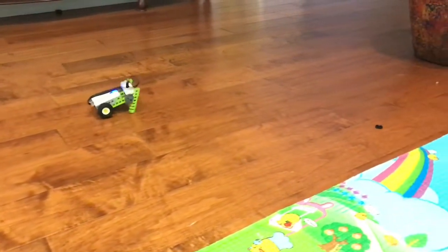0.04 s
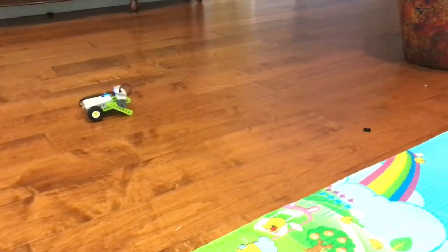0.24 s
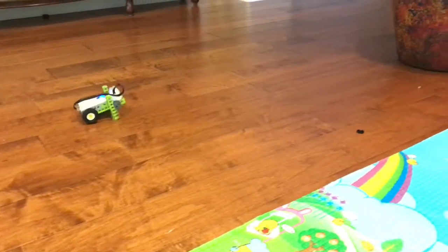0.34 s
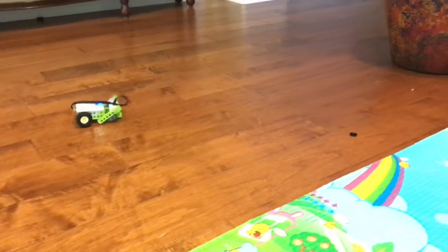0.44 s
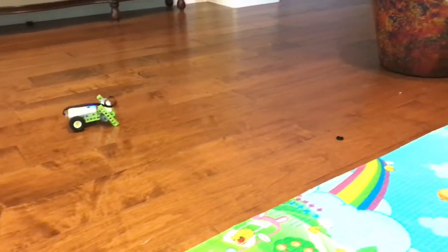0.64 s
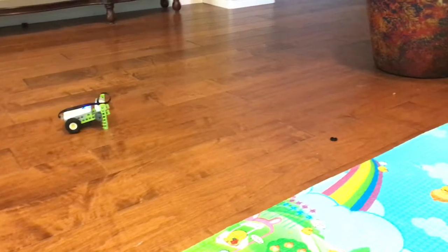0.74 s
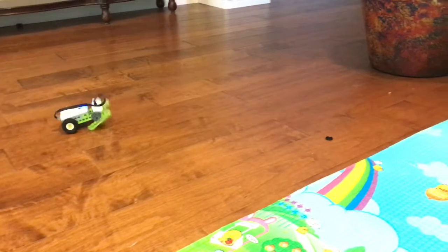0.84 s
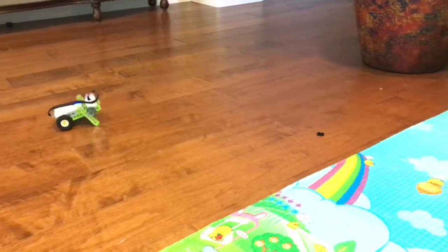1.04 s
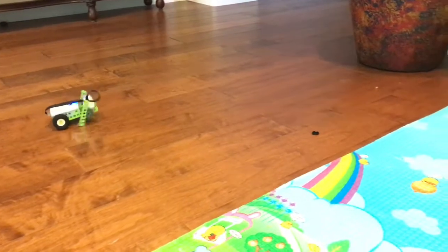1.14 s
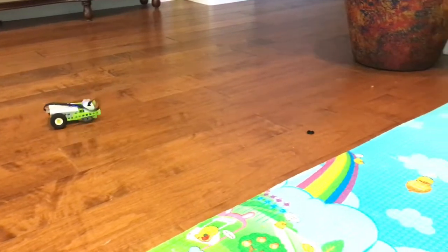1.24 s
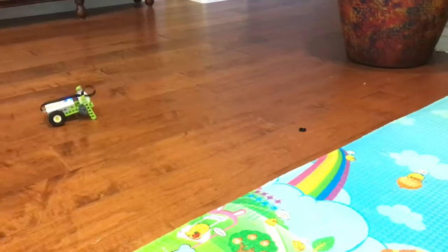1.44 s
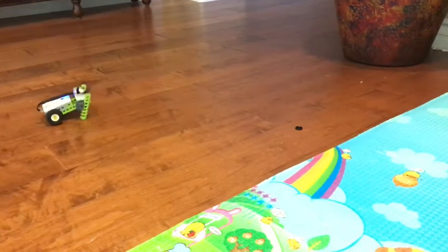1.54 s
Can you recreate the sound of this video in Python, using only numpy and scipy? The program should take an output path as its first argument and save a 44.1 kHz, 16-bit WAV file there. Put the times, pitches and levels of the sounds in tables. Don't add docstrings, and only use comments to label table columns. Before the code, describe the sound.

Hard plastic knocks from a walking toy on hardwood, with faint gear whirr and light ticking.

```python
import sys
import numpy as np
from scipy import signal
from scipy.fft import rfft, irfft, next_fast_len
from scipy.io import wavfile
from scipy.ndimage import uniform_filter1d

SR = 44100
rng = np.random.default_rng(int(sys.argv[2]) if len(sys.argv) > 2 else 0)


def put_to_file(sound):
    columns = np.atleast_2d(sound).T
    safe = np.clip(columns, -1, 1)
    whole_steps = np.round(safe * 32767)
    wavfile.write(sys.argv[1], SR, whole_steps.astype(np.int16))


def boost(x):
    u = np.asarray(x, float) / 20
    return 10 ** u


N = 70560
LEAD_S = .002

# pitch_hz [Hz], level_db [dB]
CRACK = [(300, -44), (900, -29.5), (1300, -9.5), (2000, -9.5), (5000, -13.5), (9000, -15), (16000, -21)]


def level(x, db):
    return x * boost(db) / np.sqrt(np.mean(x ** 2))


def colour(x, points):
    hz, db = np.array(points).T
    size = next_fast_len(len(x))
    pitch = np.fft.rfftfreq(size, 1 / SR)
    gain = boost(np.interp(np.log(pitch + 1), np.log(hz), db))
    return irfft(rfft(x, size) * gain, size)[:len(x)]


def ring(x, peaks):
    total = 0
    for k, (hz, width, db) in enumerate(peaks):
        b, a = signal.iirpeak(min(hz, .45 * SR), hz / width, SR)
        total = total + (-1) ** k * boost(db) * signal.lfilter(b, a, x)
    return total


def strike(x, peaks):
    total = 0
    for hz, width, db in peaks:
        narrow = ring(x, [(hz, width, 0)])
        steep = ring(narrow, [(hz, 4 * width, 0)])
        total = total + level(steep, db) * np.sqrt(width)
    return total


def chatter(length_s, noise, rise_share=.25):
    fade_s = 0.00061
    t = np.arange(len(noise)) / SR - LEAD_S
    rise = np.clip(t / (rise_share * length_s), 0, 1)
    fade = np.exp(-np.maximum(t - length_s, 0) / fade_s)
    return noise * rise * fade


def add(track, at_s, sound):
    i = int((at_s - LEAD_S) * SR)
    track[i:i + len(sound)] += sound[:N - i]


def room_tone():
    # pitch_hz [Hz], level_db [dB per Hz]
    air_colour = [(18, -42), (30, -11), (70, 4), (378, -9), (2160, -11.5), (4900, -18.5), (8760, -10.5),
                  (15200, -25), (16500, -47)]
    # pitch_hz [Hz], width_hz [Hz], level_db [dB]
    hum_parts = [(54.5, 2, -60), (94, 8.4, -68.5)]
    t = np.arange(N) / SR
    air = level(colour(rng.standard_normal(N), air_colour), -57.5)
    (hz, wander_hz, db), (low_hz, width, low_db) = hum_parts
    drift = level(uniform_filter1d(rng.standard_normal((2, N)), SR // 8), 0)
    turns = np.cumsum(hz + .3 * wander_hz * drift[1]) / SR
    hum = np.sqrt(2) * boost(db + 1.0 * drift[0]) * np.sin(2 * np.pi * turns + 1.8)
    low_peak = [(low_hz, width, 0)]
    rumble = level(ring(ring(rng.standard_normal(N), low_peak), low_peak), low_db)
    earlier_t60_s = 1
    earlier = level(colour(rng.standard_normal(N), CRACK), -58) * boost(-60 * t / earlier_t60_s)
    return air + hum + rumble + earlier


def whirr():
    # pitch_hz [Hz], width_hz [Hz], level_db [dB]
    shell_peaks = [(1204, 420, -5), (2042, 440, -0.5), (2770, 233, -5), (3710, 1300, -12),
                   (6660, 1860, -16), (8670, 560, -8.5), (13000, 6600, -19.5)]
    # start_s [s], whirr level_db [dB]
    load = [(0, -47.5), (.06, -60), (.08, -53.5), (.13, -61), (.16, -54), (.22, -51), (.44, -52),
            (.46, -47), (.6, -56.5), (.69, -54), (.8, -59.5), (.83, -57), (.91, -56.5), (.93, -51.5),
            (1.2, -55), (1.35, -54.5), (1.55, -58), (1.581, -52.5)]
    teeth_per_s, teeth_scatter_db = 1200, 3.5
    puffs_per_s, puff_db = 35, 3.5
    chance = rng.random(N)
    size = np.minimum(rng.exponential(size=N), 2)
    sign = np.sign(rng.standard_normal(N))
    teeth = (chance < teeth_per_s / SR) * sign * boost(teeth_scatter_db * size)
    span = SR // puffs_per_s
    swell = uniform_filter1d(rng.standard_normal(N), span)
    puffs = level(uniform_filter1d(swell, span // 2), 0)
    pushed = teeth * boost(puff_db * puffs)
    shell = 0
    for hz, width, db in shell_peaks:
        shell = shell + ring(ring(pushed, [(hz, width, db)]), [(hz, width, 0)])
    start_s, load_db = np.array(load).T
    return level(shell, -2) * boost(np.interp(np.arange(N) / SR, start_s, load_db))


def ticks():
    # start_s [s], peak level_db [dB], brightness_db [dB]
    taps = [(.074, -44, -12), (.0805, -38, -14), (.095, -45, -14), (.106, -44, -14), (.1590, -38, -16),
            (.178, -43, -14), (.184, -42, -14), (.209, -46, -14), (.4526, -29, -5), (.47, -39, -8),
            (.5665, -26, 5), (.583, -28, 0), (.6454, -26, 1), (.648, -31, -3), (.7557, -38, -12),
            (.822, -43, -10), (.8295, -39, -5), (.862, -45, -12), (.926, -41, -12), (.940, -41, -12),
            (.945, -38, -6), (.949, -38, -6), (1.2, -39, -8), (1.257, -37, -6), (1.3962, -29, 3),
            (1.3988, -25, -4), (1.5758, -41, -10), (1.585, -42, -10)]
    # pitch_hz [Hz], width_hz [Hz], level_db [dB]
    tick_body = [(1600, 500, -12), (2150, 500, 0), (2750, 700, -3)]
    # pitch_hz [Hz], level_db [dB]
    tick_crack = [(1500, -30), (3000, -6), (6000, -1), (9500, 0), (12500, -6), (16000, -12)]
    contact_s = .0022
    out = np.zeros(N)
    noise = rng.standard_normal((len(taps), 2, 1024))
    for (at_s, db, bright_db), (body_noise, crack_noise) in zip(taps, noise):
        body = strike(chatter(contact_s, body_noise), tick_body)
        body = level(ring(body, [(2120, 1170, 0)]), 0)
        crack = level(colour(chatter(contact_s, crack_noise), tick_crack), bright_db)
        tap = body + crack
        add(out, at_s, tap * boost(db) / np.abs(tap).max())
    return out


def room_response():
    # pitch_hz [Hz], time to fall by 60 dB [s]
    decay = [(500, 0.61), (1320, 0.45), (3480, 0.67), (9190, 0.47), (15000, 0.3)]
    build_s = 0.0013
    t = np.arange(SR) / SR
    hz, t60 = np.array(decay).T
    tail = 0
    for centre in 250 * 2 ** np.arange(0, 6.1, .5):
        edges = [centre / 1.19, centre * 1.19]
        band_filter = signal.butter(2, edges, "band", fs=SR, output="sos")
        band = signal.sosfilt(band_filter, rng.standard_normal(SR))
        tail = tail + band * boost(-60 * t / np.interp(np.log(centre), np.log(hz), t60))
    tail = tail * (1 - np.exp(-(t / build_s) ** 2))
    return tail / np.sqrt(np.sum(tail ** 2))


def knocks():
    # start_s [s], peak level_db [dB], chatter length_s [s]
    hits = [
        (.2232, -4, .0016),
        (.5270, -14.5, .0030),
        (.9729, -7, .0022),
        (1.2770, -15, .0033),
    ]
    # pitch_hz [Hz], width_hz [Hz], level_db [dB]
    slap_1 = [(1386, 360, 1), (3220, 270, -1), (4655, 750, 6.5), (6100, 430, 2.5), (6480, 320, 0),
              (8260, 1400, -2), (9200, 750, -13), (9850, 210, -18), (12100, 670, 2), (13400, 240, -19),
              (15000, 400, -12), (16400, 570, -4)]
    drop_1 = [(1870, 650, 2.5), (3140, 370, 2.5), (3650, 180, 4), (4600, 220, -21), (5700, 490, -7),
              (6160, 210, -20), (9050, 320, 0), (11400, 140, -23), (11700, 550, -3.5), (13500, 200, -19)]
    slap_2 = [(1730, 230, -0.5), (2650, 830, 3), (4460, 480, 3.5), (6420, 690, 1), (7670, 790, 0.5),
              (9400, 250, -9), (12000, 990, -2), (13700, 860, -2.5)]
    drop_2 = [(990, 300, -7), (1870, 320, 7), (2520, 200, -20), (2960, 220, 6.5), (3840, 400, 9),
              (5500, 400, -14), (6800, 400, -13), (9060, 380, 2), (11550, 190, -5), (13000, 400, -14),
              (15850, 550, -1)]
    # pitch_hz [Hz], level_db [dB]
    slap_wash_1 = [(180, -42), (300, -33), (1210, -5.5), (1510, -5), (1930, -3), (2440, -10.5),
                   (2700, -5.5), (9090, -7.5), (16000, -14.5)]
    slap_wash_2 = [(300, -24), (1050, -14.5), (1250, -7), (2000, -6), (2700, -4), (4500, -6.5),
                   (9000, -6.5), (16000, -10.5)]
    drop_wash = [(150, 0), (450, -24), (1000, -2), (1500, -6), (3700, -6), (5500, -13.5), (9000, -13),
                 (16000, -14)]
    # pitch_hz [Hz], width_hz [Hz], level_db [dB]
    drop_ring = [
        [(2030, 200, 10), (8900, 500, 13)],
        [(1900, 200, 7), (11050, 160, 12)],
    ]
    wash_levels = [3, -1, 4.5, -2.5]
    rise_shares = [.4, .4, .05, .6]
    bodies = (slap_1, drop_1, slap_2, drop_2)
    direct, wash = np.zeros(N), np.zeros(N)
    noise = rng.standard_normal((len(hits), 2, 1024))
    for k, (at_s, db, length_s) in enumerate(hits):
        body = level(strike(chatter(length_s, noise[k, 0], rise_shares[k]), bodies[k]), 0)
        crack = level(colour(chatter(length_s, noise[k, 1], rise_shares[k]), CRACK), -3.5)
        knock = body + crack
        add(direct, at_s, boost(db) * knock / np.abs(knock).max())
        tail = np.r_[np.zeros(88), room_response()]
        if k % 2:
            tail = colour(tail + ring(tail, drop_ring[k // 2]), drop_wash)
        else:
            tail = colour(tail, (slap_wash_1, slap_wash_2)[k // 2])
        add(wash, at_s, tail * boost(wash_levels[k]) / np.sqrt(np.sum(tail ** 2)))
    return direct, wash


def scene():
    # delay_s [s], level_db [dB]
    echoes = [(.0052, -12), (.0094, -13), (.0148, -15), (.0185, -18)]
    hit, wash = knocks()
    small, gears = ticks(), whirr()
    out = hit + small + gears + wash + room_tone()
    for delay_s, db in echoes:
        lag = int(delay_s * SR)
        out[lag:] += boost(db) * (hit + small)[:-lag]
    feed = boost(-3.5) * small + boost(-3) * gears
    reverb = signal.fftconvolve(feed, room_response())[:N]
    return (out + reverb)[None]


def low_pass(x):
    return signal.sosfilt(signal.butter(12, 17120, fs=SR, output="sos"), x)


def record(dry):
    top_cut = signal.ellip(8, .3, 34, 15750, fs=SR, output="sos")
    mix = signal.sosfilt(top_cut, dry)
    return low_pass(mix)


dry = scene()
out = record(dry)
put_to_file(out)
```